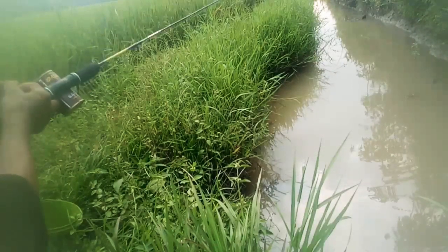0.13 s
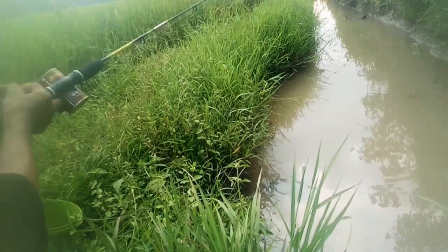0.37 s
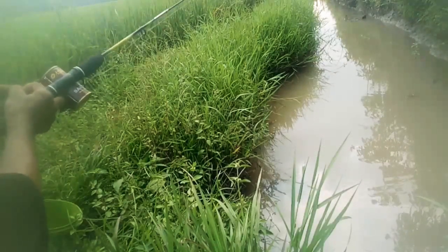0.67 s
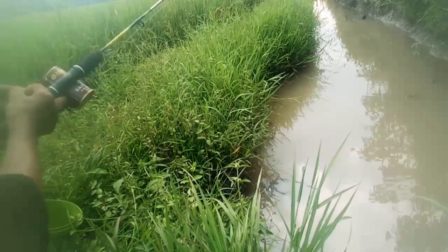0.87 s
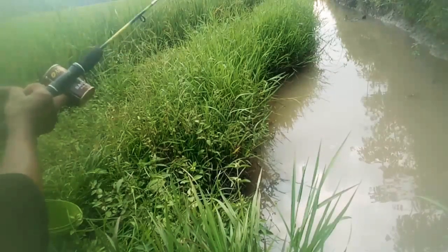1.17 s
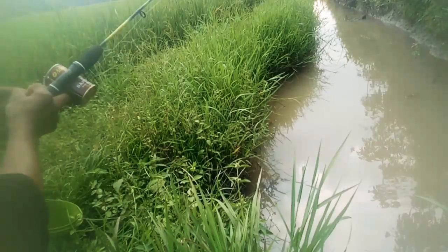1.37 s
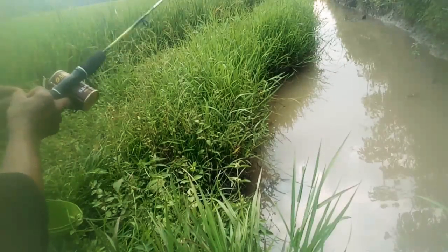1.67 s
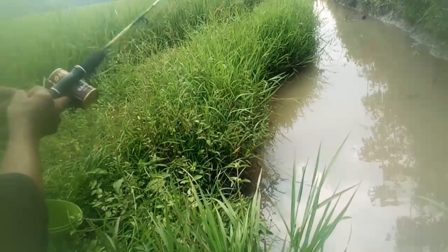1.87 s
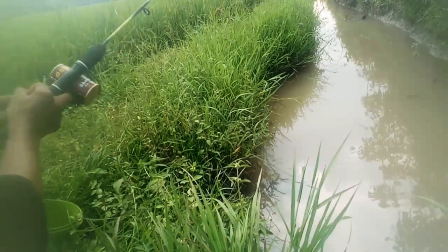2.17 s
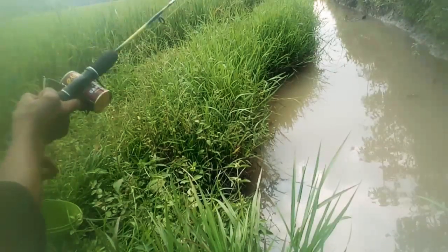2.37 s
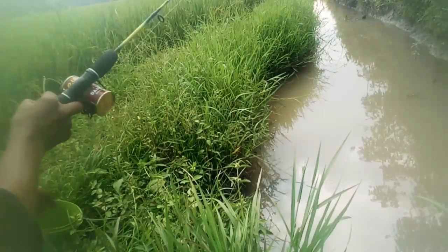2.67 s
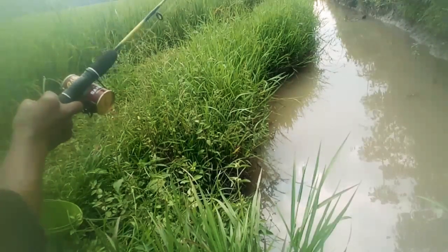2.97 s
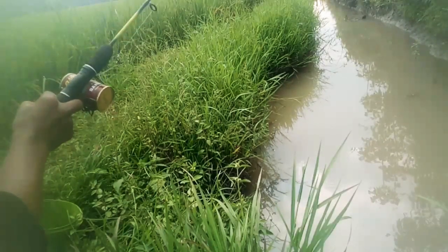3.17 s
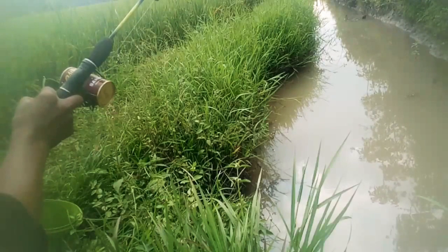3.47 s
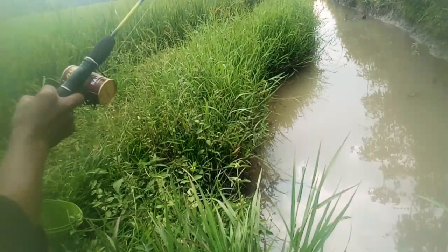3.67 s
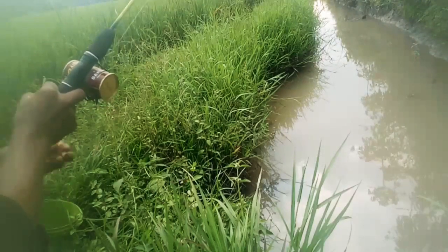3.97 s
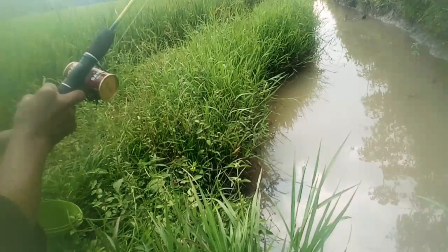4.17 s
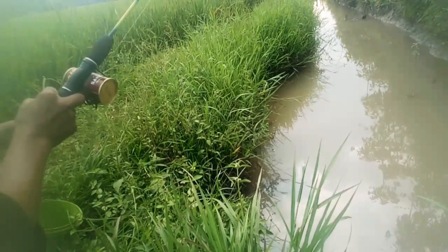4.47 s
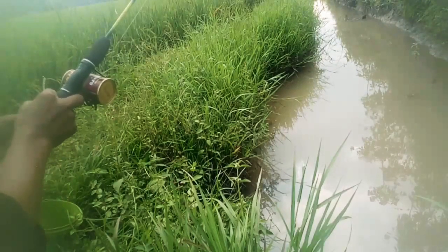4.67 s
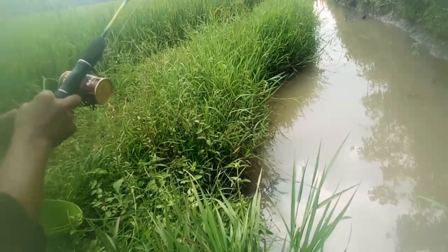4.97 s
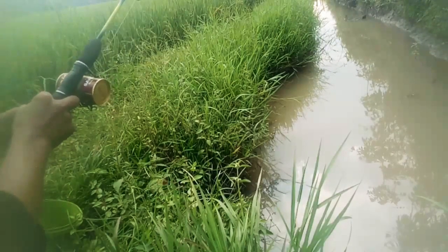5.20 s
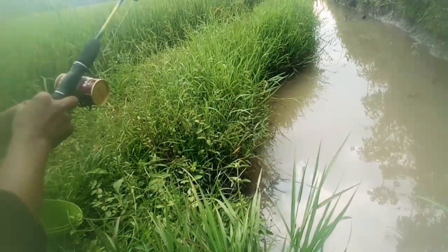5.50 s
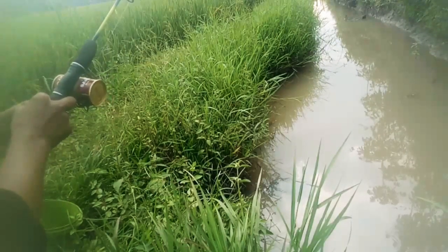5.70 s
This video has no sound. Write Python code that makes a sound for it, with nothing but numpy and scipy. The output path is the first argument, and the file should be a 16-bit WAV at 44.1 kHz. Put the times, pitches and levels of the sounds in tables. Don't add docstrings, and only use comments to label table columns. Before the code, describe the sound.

Cicadas buzz in a dense fluttering chorus beside a field ditch, breaking into short falling whistles, while wind rumbles and puffs on the microphone.

```python
import sys
import numpy as np
from scipy import signal
from scipy.fft import rfft, irfft, next_fast_len
from scipy.io import wavfile
from scipy.ndimage import uniform_filter1d, map_coordinates

SR = 44100
rng = np.random.default_rng(int(sys.argv[2]) if len(sys.argv) > 2 else 0)


def persist_wave(psi):
    counts = np.round(np.clip(psi, -1, 1) * 32767).astype(np.int16)
    wavfile.write(sys.argv[1], SR, np.atleast_2d(counts).T)


def magnitude_from_level(level_db):
    exponent = np.asarray(level_db, float) / 20
    return 10 ** exponent


N = 257527

# pitch_hz, width_hz, near_db, second_db, crowd_db
BUZZ_BANDS = [(1152, 155, -49, -36, -5), (1249, 134, -31, 1, -5), (1433, 66, -39, -51, -10.5),
              (1935, 59, -25, -39, -10), (2260, 173, -12, -8, 1), (2469, 237, -3, -8.5, -2.5),
              (2800, 500, -49, -20, -15), (3613, 586, -2.5, -2.5, -0.5), (4200, 680, -38, -19, -7),
              (4694, 360, 1.5, -0.5, -2), (5780, 630, -12, -34, -39), (5982, 325, -7.5, -7, -6),
              (6490, 310, -27, -10.5, -20), (7094, 450, -9, -12.5, -22), (7540, 410, -40, -15.5, -40),
              (8380, 860, -16.5, -14.5, -15.5), (9486, 520, -5.5, -22, -8.5),
              (9910, 930, -12.5, -20, -14.5), (10615, 440, -14, -28, -11), (12300, 610, -19.5, -48, -35),
              (13050, 500, -24.5, -29, -32), (14400, 640, -19.5, -48, -54), (14400, 470, -39, -38, -44),
              (15160, 540, -20.5, -44, -46)]
# start_s, length_s, end_db, octave_below_db
NEAR_CALLS = [
    (-.31, .15, -60, -70),
    (.883, 0.15, -42, -64),
    (2.081, .16, -42.5, -67),
    (3.287, .15, -42, -65.5),
    (4.462, 0.1586, -43, -73.5),
    (5.643, 0.16, -43, -63),
]
SECOND_CALLS = [
    (.229, .182, -49, -69),
    (1.358, 0.17, -49.5, -85),
    (2.49, .25, -50, -73),
    (3.673, 0.182, -49.5, -70),
    (4.836, 0.17, -51, -66.5),
]
THIRD_CALLS = [
    (.06, 0.17, -53, -64.5),
    (1.38, 0.15, -62, -61.5),
    (2.66, 0.15, -62, -61.5),
    (3.92, .18, -56.5, -62),
    (5.225, 0.141, -63, -61),
]
# start_hz, end_hz, bend (no unit), swell_db, octave_below_swell_db
NEAR_VOICE = (2232, 2160, 1.47, 7.6, 3)
SECOND_VOICE = (2285, 2180, 0.603, 4, 2.4)
THIRD_VOICE = (2222, 2165, 1.07, .6, 1.5)
# start_s, length_s, start_hz, end_db
FAR_CALLS = [(.425, .055, 2240, -57), (.66, 0.13, 2280, -56.5), (0.974, 0.12, 2350, -55),
             (2.2, 0.15, 2366, -56.5), (3.431, 0.14, 2365, -56), (4.3, .1, 2275, -60),
             (5.23, 0.091, 2217, -51.5), (1.525, 0.037, 2220, -53), (1.887, 0.077, 2265, -57),
             (2.75, 0.116, 2247, -51), (3.094, 0.096, 2260, -55.5), (4.107, 0.085, 2214, -55),
             (4.75, .078, 2174, -57), (5.0, 0.072, 2230, -57), (5.39, 0.11, 2260, -58.5),
             (5.575, .035, 2275, -52.5)]
# stop_before_s, fade_s, wait_after_s, recovery_s
NEAR_REST = (.012, .04, .015, .12)
SECOND_REST = (0.036, 0.046, 0.033, 0.14)
THIRD_REST = (0.085, 0.068, 0.012, 0.047)
# time_s, level_db
NEAR_EFFORT = [(0, 0), (.6, -0.5), (1.2, 1), (1.5, -2.5), (1.9, -1), (2.5, .4), (4.3, 0.9), (4.8, -0.4),
               (5.4, 0.5)]
# centre_s, half_length_s, lift_db
LIFTS = [(.14, .05, 12), (.5, .15, 4), (1.05, 0.11, 7), (1.75, .2, 5), (2.47, 0.18, 8), (3.0, 0.04, 10),
         (3.23, .05, 7), (3.6, 0.28, 13), (4.203, 0.16, 11), (4.618, 0.13, 10), (5.2, 0.31, 10),
         (5.72, .1, 7)]
# centre_s, half_length_s, change_db
DRIFTS = [(.52, 0.097, -14), (.92, 0.15, 2.5), (1.68, .12, -5), (2.05, .06, -4), (2.27, 0.087, 4),
          (2.7, .12, -1), (3.03, 0.066, -5), (3.5, 0.47, 2), (5.1, .1, -6), (5.5, .13, -2),
          (5.75, 0.12, 5.5)]
# time_s, strength_db, squareness_db (how squarely it strikes the port)
WIND = [(0, -82, 6), (.26, -58.5, -10), (1.2, -63, -10), (1.77, -59, -7), (1.86, -83, 2), (2.17, -57, -20),
        (2.95, -58, -16), (3.3, -78, 2), (3.68, -66, -8), (3.95, -67.5, 11), (4.05, -57, -1.5),
        (4.3, -62.5, 6.5), (4.81, -54, 3.5), (4.92, -58, -1.5), (5.17, -53, 2), (5.45, -57, 3),
        (5.67, -62, -13), (5.76, -61, 13)]
# pitch_hz, level_db (per Hz)
BUFFET = [(12, -47), (20, -15), (62, 9.5), (91, 11), (140, -13), (248, -19), (400, -31), (520, -67),
          (880, -120)]
ROAR = [(15, -56), (25, -33), (86, -13), (134, 4), (154, -4), (242, -23), (389, -32), (500, -39),
        (650, -50), (1100, -120)]
# time_s, peak_db, pitch_hz
PUFFS = [(4.012, -40.5, 90), (4.038, -40, 116), (4.123, -30.5, 84), (4.149, -40, 86), (4.205, -38.5, 95),
         (4.423, -38, 96), (4.481, -43, 95), (4.582, -37.5, 91), (4.647, -44, 88), (4.726, -43, 101),
         (4.763, -40, 81), (4.793, -33, 95), (4.813, -43, 106), (4.838, -46, 116), (4.884, -45, 104),
         (4.957, -44, 103), (4.996, -38.5, 88), (5.035, -32, 91), (5.073, -44, 94), (5.104, -34.5, 103),
         (5.133, -37, 90), (5.153, -43, 111), (5.173, -35.5, 92), (5.205, -38.5, 145), (5.232, -42, 85),
         (5.375, -42, 85), (5.763, -37, 85), (5.791, -46, 80), (5.816, -45, 81.5)]
# first_step_s, step_length_s
FILTER_STEP = (.006, .02)
# time_s, level_db
TICKS = [(0.569, -68), (2.287, -68), (2.627, -68.5), (3.947, -64), (4.007, -70), (4.148, -63), (4.566, -66),
         (4.586, -65), (4.746, -70), (4.787, -59), (4.806, -62), (4.848, -64), (4.867, -66), (5.027, -68),
         (5.048, -66), (5.128, -65), (5.148, -70), (5.168, -68), (5.208, -69), (5.267, -66), (5.749, -69)]
# start_s, level_db
KNOCK = (2.81, -37.5)
# pitch_hz, time_to_fall_60_db_s, level_db
HOUSING = [
    (437, 0.094, -8.5),
    (340, .06, -14),
    (427, 0.28, -24),
    (800, 0.044, -17),
]
# pitch_hz, level_db (per Hz)
AIR = [(20, -8), (200, -0.5), (600, -10), (1700, -9.5), (6000, 2), (11500, -10), (16000, -15.5)]


def near_cicada():
    resting, progress = phrase(NEAR_CALLS, NEAR_REST)
    level_db = -67.5 + curves(NEAR_EFFORT)[0] + 0.4 * wobble(9)
    drive = strokes(28, 0.0097, 0.0028, rest=0.6, repeat=0.9)

    def swelling(hz):
        return np.exp(-((hz - 10000) / 1400) ** 4)

    upper_db = level_db - 2 + 4.5 * progress - 12 * resting
    upper = ring_plates(drive * magnitude_from_level(upper_db), 0, swelling)
    others = ring_plates(drive * magnitude_from_level(level_db - 13 * resting), 0, lambda hz: 1 - swelling(hz))
    return magnitude_from_level(28) * patchy(upper + others, depth_db=0.4)


def second_cicada():
    resting, progress = phrase(SECOND_CALLS, SECOND_REST)
    third_resting = phrase(THIRD_CALLS, THIRD_REST)[0]
    buzz_db = -65 + 0.9 * progress - 3.5 * resting - 3 * third_resting
    drive = strokes(26.5, 0.0095, 0.0055, rest=0.93, repeat=0.58)
    return magnitude_from_level(buzz_db + 24) * patchy(ring_plates(drive, 1), depth_db=2.5)


def whistles():
    out = np.zeros(N + SR)
    waver_hz, breeze = 7 * wobble(30), wobble(55)
    for start_s, length_s, hz0, hz1, bend, db0, db1 in whistle_notes():
        t = np.arange(0, length_s, 1 / SR)
        part = t / length_s
        first = round(start_s * SR)
        fade_out = np.sin(np.clip(t[::-1] / 0.011, 0, 1) * np.pi / 2) ** 2
        edges = np.clip(t / 0.01, 0, 1) * fade_out
        unsteady_db = np.clip(0.25 * (-39 - db1), 0, 2.2) if hz0 > 2000 else 1.5
        flutter_db = unsteady_db * breeze[first:][:len(t)]
        flutter_db += 2.2 * (1 - part) * np.cos(2 * np.pi * 27 * (t - 0.012))
        pitch_hz = hz0 + (hz1 - hz0) * part ** bend + waver_hz[first:][:len(t)]
        phase = 2 * np.pi * (np.cumsum(pitch_hz) / SR + rng.random())
        level_db = db0 + (db1 - db0) * part ** 1.95 + flutter_db
        out[first:][:len(t)] += np.sqrt(2) * magnitude_from_level(level_db) * edges * np.sin(phase)
    out = out[:N] * magnitude_from_level(1.3 * wobble(90))
    t = np.arange(SR // 4) / SR
    tail = rng.standard_normal(len(t)) * magnitude_from_level(-60 * t / 0.15)
    blur = signal.fftconvolve(out, tail / np.linalg.norm(tail))[:N]
    return out + magnitude_from_level(-15) * blur


def whistle_notes():
    sag_hz_per_s, swell_db_per_s = 455, 36
    notes = []
    for s, length, hz, db in FAR_CALLS:
        notes.append((s, length, hz, hz - sag_hz_per_s * length, 1, db - swell_db_per_s * length, db))
    singers = (NEAR_CALLS[1:], NEAR_VOICE), (SECOND_CALLS, SECOND_VOICE), (THIRD_CALLS, THIRD_VOICE)
    for calls, (hz0, hz1, bend, swell_db, low_swell_db) in singers:
        for s, length, db, low_db in calls:
            notes.append((s, length, hz0, hz1, bend, db - swell_db, db))
            notes.append((s, length, hz0 / 2, hz1 / 2, bend, low_db - low_swell_db, low_db))
    return notes


def crowd():
    buzz_db = -52 - 0.7 * phrase(THIRD_CALLS, THIRD_REST)[0]
    edge_db = -78 + swells(LIFTS)
    drive = np.zeros(N)
    for group_hz in (23.93, 27.27, 29.38, 30.82):
        singer = strokes(group_hz, 0.00906, 0.0039, rest=0.83, repeat=0.39)
        drive += singer * magnitude_from_level(1.6 * wobble(4.09))
    drive = unit(drive)

    def below(hz, top_hz):
        return 1 / (1 + (hz / top_hz) ** 40)

    bass = magnitude_from_level(-37.5) * ring_plates(drive, 2, lambda hz: below(hz, 1293) - below(hz, 1026))
    edge = magnitude_from_level(edge_db + 33.5) * ring_plates(drive, 2, lambda hz: below(hz, 1820) - below(hz, 1304))
    treble = magnitude_from_level(buzz_db + 14.5) * ring_plates(drive, 2, lambda hz: 1 - below(hz, 2303))
    drifting = ring_plates(drive, 2, lambda hz: below(hz, 2294) - below(hz, 1740))
    treble += magnitude_from_level(buzz_db + 14.5 + swells(DRIFTS)) * drifting
    return patchy(bass + edge, depth_db=0.3) + patchy(treble, depth_db=0.54)


def wind():
    roar_db, squarely_db = curves(WIND)
    buffet = magnitude_from_level(roar_db + squarely_db - 1.5 + 3.2 * wobble(13)) * rush(BUFFET)
    roar = magnitude_from_level(roar_db - 1 + 2.1 * wobble(15)) * rush(ROAR)
    rumble = buffet + roar
    t = np.arange(-1000, 1000) / SR
    for s, db, hz in PUFFS:
        swing = np.cos(2 * np.pi * (hz * t + rng.uniform(0, 0.29)))
        puff = magnitude_from_level(db - 1.5) * np.exp(-(t * hz / 0.63) ** 2) * swing
        rumble[round(s * SR) - 1000:][:len(t)] += puff
    first_s, step_s = FILTER_STEP
    block = ((np.arange(N) / SR - first_s) // step_s + 1).astype(int)
    rumble *= magnitude_from_level(0.5 * rng.uniform(-0.37, 1, block[-1] + 1))[block]
    jump = np.exp(-np.arange(800) / SR / 0.0026)
    for s, db in TICKS:
        rumble[round(s * SR):][:len(jump)] += magnitude_from_level(db + 13) * rng.choice([-1, 1]) * jump
    return rumble


def knock():
    start_s, level_db = KNOCK
    contact_hz, contact_s = 384, 0.0074
    t = np.clip(np.arange(N) / SR - start_s, 0, 1)
    push = np.exp(-(t / contact_s) ** 3.5) * (1 - np.exp(-t / 0.00055))
    thump = push * np.sin(2 * np.pi * contact_hz * t)
    ring = sum(magnitude_from_level(db - 60 * t / t60) * np.sin(2 * np.pi * hz * t) for hz, t60, db in HOUSING)
    ring *= 1 - np.exp(-t / 0.0032)
    return -magnitude_from_level(level_db) * (thump + ring)


def open_air():
    return magnitude_from_level(-64) * patchy(rush(AIR), depth_db=2.7)


def strokes(group_hz, spacing_s, length_s, rest, repeat):
    cycle = np.cumsum(group_hz * (1 + 0.003 * wobble(2.963))) / SR + rng.random()
    size = magnitude_from_level(0.71 * rng.standard_normal((int(cycle[-1]) + 1, 4)))[cycle.astype(int)]
    within_s = (cycle % 1) / group_hz
    since_s = within_s[:, None] - spacing_s * (np.arange(4) + 0.33)
    bursts = size * [1.0, 0.97, 0.99, 0.46] * np.exp(-(since_s / length_s) ** 2)
    gate = np.sum(bursts, axis=1)
    habit = rng.standard_normal(SR // 10)[(within_s * SR).astype(int)]
    return unit((rest + gate) * (rng.standard_normal(N) + repeat * habit))


def ring_plates(drive, singer, part=lambda hz: 1):
    def bands(hz):
        power = 0
        for row in BUZZ_BANDS:
            offset = 2 * (hz - row[0]) / row[1]
            power = power + (magnitude_from_level(row[2 + singer]) / (1 + offset ** 2) ** 0.99) ** 2
        return np.sqrt(power)

    return filtered(drive, lambda hz: bands(hz) * part(hz))


def phrase(calls, rest):
    t = np.arange(N) / SR
    start, length = np.transpose(calls)[:2]
    lead_s, fade_s, wait_s, recover_s = rest
    stop, resume = start - lead_s, start + length + wait_s
    resting = np.zeros(N)
    for a, b in zip(stop, resume):
        resting += np.interp(t, [a - fade_s, a, b, b + recover_s], [0, 1, 1, 0])
    turns = np.ravel([stop, resume], order="F")
    progress = np.interp(t, turns, np.tile([1, 0], len(stop)))
    return resting, progress


def swells(rows):
    t = np.arange(N) / SR
    return sum(db * np.exp(-((t - s) / half_s) ** 2) for s, half_s, db in rows)


def patchy(x, depth_db):
    z = signal.stft(x, nperseg=1024)[2]
    field = uniform_filter1d(rng.standard_normal(z.shape), size=4, axis=0)
    field = uniform_filter1d(field, size=14, axis=1)
    return signal.istft(z * magnitude_from_level(depth_db * unit(field)), nperseg=1024)[1][:N]


def rush(spectrum):
    f, db = np.transpose(spectrum)
    noise = rng.standard_normal(N)
    return unit(filtered(noise, lambda hz: magnitude_from_level(np.interp(np.log(hz + 1), np.log(f), db))))


def filtered(x, gain):
    m = next_fast_len(N + 8192)
    return irfft(rfft(x, m) * gain(np.fft.rfftfreq(m, 1 / SR)), m)[:N]


def wobble(rate_hz):
    knots = rng.standard_normal(int(N * rate_hz / SR) + 4)
    return map_coordinates(knots, [np.arange(N) * rate_hz / SR])


def curves(rows):
    s, *cols = np.transpose(rows)
    return [np.interp(np.arange(N) / SR, s, c) for c in cols]


def unit(x):
    return x / np.sqrt(np.mean(x ** 2) + 1e-20)


def denoised(x, strength):
    hz, _, z = signal.stft(x, SR, nperseg=2048, noverlap=1536)
    size = np.abs(z) + 1e-12
    usual = uniform_filter1d(uniform_filter1d(size, size=41, axis=0), size=5, axis=1)
    contrast = np.clip(size / np.abs(usual), 0.05, 2.5)
    gain = contrast ** (strength * (hz[:, None] > 1000))
    return signal.istft(z * gain, SR, nperseg=2048, noverlap=1536)[1][:N]


def scene():
    cicadas = near_cicada() + second_cicada() + whistles() + crowd()
    return (cicadas + wind() + knock() + open_air())[None]


def top_cut(x):
    return signal.sosfilt(signal.butter(12, 15660, fs=SR, output="sos"), x)


def record(dry):
    mix = denoised(dry[0], strength=0.083)[None]
    return top_cut(mix)


dry = scene()
out = record(dry)
persist_wave(out)
```